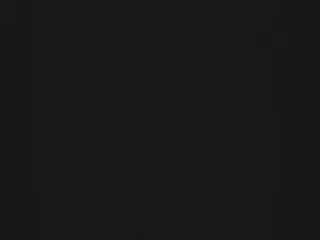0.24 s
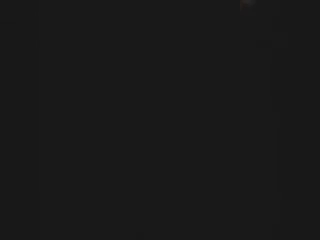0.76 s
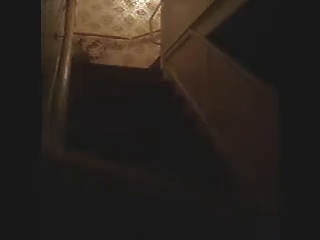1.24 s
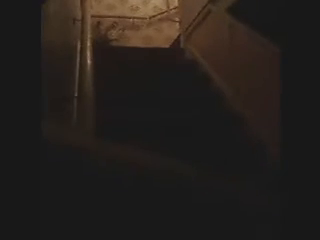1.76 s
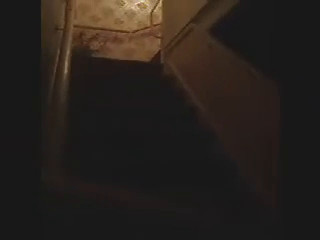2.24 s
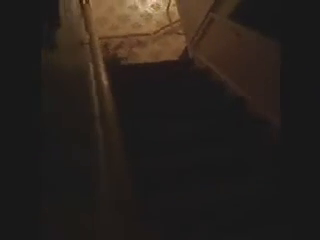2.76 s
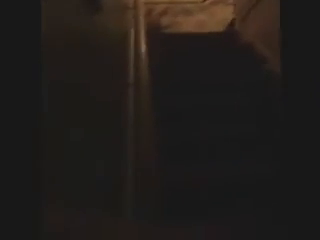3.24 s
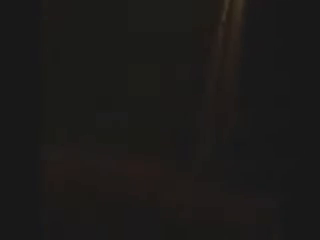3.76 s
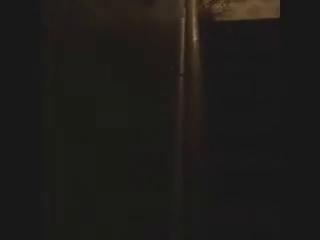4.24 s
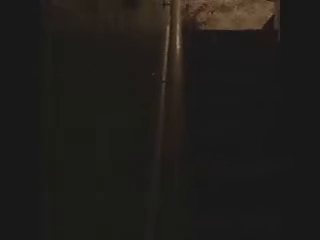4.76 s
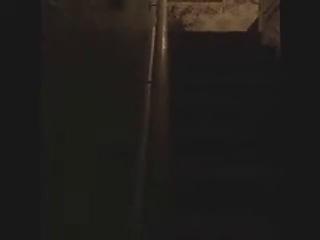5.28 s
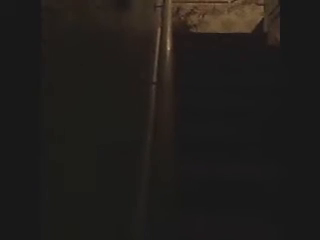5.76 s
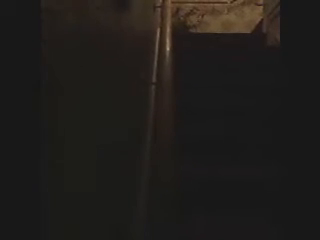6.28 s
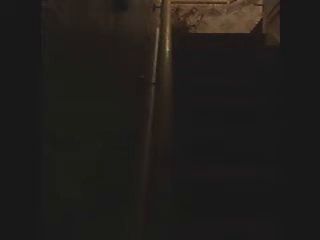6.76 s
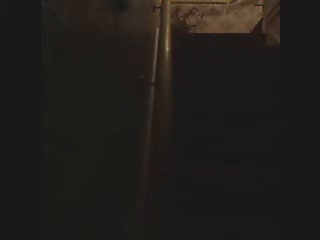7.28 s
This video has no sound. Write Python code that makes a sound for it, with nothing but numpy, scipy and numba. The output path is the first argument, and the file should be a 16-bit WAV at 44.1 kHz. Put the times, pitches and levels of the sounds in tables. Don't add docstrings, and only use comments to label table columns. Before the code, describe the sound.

Close, dry handling noise from a small plastic camera beside an indoor staircase, over constant low hiss. At about 0.07 s a loud knock with a deep bump and ticks hits the microphone, followed by a short rub and faint scratches until 0.2 s. It quietens, with slight rubbing near 0.6 and 0.8 s. At 1.58 s a plastic catch snaps, then palm and finger rubbing grows. From 2.5 s ticks, a rasp and thuds gather; heavy knocks cluster at 2.85-3.05 s with a sharp crack and scrape. Dull pushes come around 3.6-3.8 s, then the harshest bright rasps and a hard crack at 3.9-4.0 s. Lighter rubs continue, with small knocks at 5.25-5.8 s. Afterwards only hiss, faint sleeve brushing, a tiny tick at 7.24 s and a clearer distant low motor hum remain until 7.5 s. The tone is boxy and narrow, with faint mirrored treble grit.

```python
import sys
import numpy as np
from scipy import signal
from scipy.fft import rfft, irfft, next_fast_len
from scipy.io import wavfile
from scipy.ndimage import uniform_filter1d
from numba import njit

SR = 44100
rng = np.random.default_rng(int(sys.argv[2]) if len(sys.argv) > 2 else 0)


def volts_from_db(level):
    exponent = np.asarray(level, float) / 20
    return 10 ** exponent


def unload_wav(signal):
    wavfile.write(
        sys.argv[1],
        SR,
        np.round(np.clip(np.atleast_2d(signal).T, -1, 1) * 32767).astype(np.int16),
    )


N = 331587


@njit
def svf(x, hz, width):
    y, b, l = np.empty(len(x)), 0., 0.
    g, k = np.tan(np.pi * hz / SR), width / hz
    for i in range(len(x)):
        v = (b + g * (x[i] - l)) / (1 + g * (g + k))
        b, l, y[i] = 2 * v - b, l + 2 * g * v, k * v
    return y


def unit(x):
    return x / np.sqrt(np.mean(x ** 2))


def walk(rate):
    hold = int(SR / rate)
    steps = np.repeat(rng.standard_normal(N // hold + 1), hold)
    return 1.45 * uniform_filter1d(uniform_filter1d(steps, hold), hold)[:N]


def slips(rate, spread_db):
    when, size, sign = rng.random(N), rng.exponential(size=N), rng.standard_normal(N)
    return (when < rate / SR) * np.clip(sign, -2, 2) * volts_from_db(spread_db * np.minimum(size, 3))


def ring(x, modes):
    total = 0
    for hz, width, db in modes:
        once = svf(x, 1. * hz, 1.55 * width)
        twice = svf(once, 1. * hz, 1.55 * width) / np.sqrt(width)
        total = total + volts_from_db(db) * twice
    return unit(total)


def strokes(s, db, swell_s, fade_s):
    rounding = 1.61
    t = np.arange(0, N + 64, 64)[:, None] / SR - s
    drop_db = 20 * np.maximum(-t / swell_s, t / fade_s) ** rounding
    power = volts_from_db(2 * (db - drop_db)).sum(axis=1)
    return np.interp(np.arange(N) / 64, np.arange(len(t)), np.sqrt(power))


def palm_level():
    # peak_s, level_db, swell_s and fade_s (times for 20 dB)
    presses = [(0, -34.5, .1, 0.1), (0.16, -27.5, 0.063, 0.039), (.609, -49, 0.083, 0.041),
               (.813, -45, 0.09, 0.32), (1.4, -40.5, 0.17, 0.34), (1.626, -33.5, 0.28, 0.31),
               (1.756, -36, 0.18, 0.082), (1.836, -30.5, 0.018, 0.088), (2.011, -31.5, 0.15, 0.16),
               (2.175, -37, 0.038, .25), (2.4, -37.5, .25, 0.048), (2.53, -29, 0.15, 0.065),
               (2.64, -26, 0.11, 0.37), (2.868, -20.5, 0.13, 0.16), (2.943, -29, 0.16, 0.056),
               (3.062, -28, 0.052, 0.033), (3.392, -35.5, 0.43, 0.22), (3.57, -29, 0.13, 0.16),
               (3.729, -24, 0.11, 0.056), (3.85, -34, .05, .2), (3.955, -27, 0.26, 0.099),
               (4.15, -39.5, 0.29, .2), (4.355, -33.5, 0.37, .25), (4.59, -39, 0.23, 0.13),
               (4.759, -40, .17, 0.23), (5.33, -33.5, 0.15, 0.16), (5.42, -35.5, 0.12, 0.14),
               (5.652, -41, 0.21, 0.27), (5.97, -54, 0.091, 0.49), (6.994, -48.5, 0.089, 0.18)]
    resting_db = -54
    return np.hypot(strokes(*np.transpose(presses)), volts_from_db(resting_db))


def finger_and_sleeve_levels():
    # peak_s, level_db, swell_s and fade_s (times for 20 dB), cloth_share_db
    rubs = [(.05, -37, .3, 0.095, -6), (0.161, -25.5, 0.058, 0.015, -20), (.6, -46.5, 0.26, 0.18, -12),
            (.813, -41.5, 0.13, 0.16, -7), (1.412, -41, 0.42, .2, -6), (1.74, -31, 0.41, 0.19, -7.5),
            (2.011, -27, 0.12, 0.093, -5), (2.19, -39, 0.17, 0.47, -5.5), (2.49, -34, 0.091, 0.079, -5),
            (2.65, -22.5, .15, 0.2, -3.5), (2.868, -22, 0.28, 0.15, -4.5), (3.03, -31, 0.11, 0.091, 2),
            (3.558, -31.5, 0.22, 0.22, -25), (3.675, -25.5, 0.17, 0.084, -3.5),
            (3.85, -21.5, 0.062, 0.16, -11), (3.94, -20.5, 0.12, 0.093, 1.5),
            (4.101, -34, 0.14, 0.074, 0.5), (4.33, -34, 0.88, 0.33, -4), (4.59, -35.5, 0.23, 0.08, -3),
            (4.76, -41.5, 0.24, .22, -7), (5.31, -34.5, 0.075, 0.16, -13), (5.41, -33.5, 0.15, 0.067, -5),
            (5.66, -38.5, 0.13, 0.13, -7), (5.767, -40, 0.086, 0.055, -4),
            (1.15, -58, 0.22, 0.28, -16), (2.77, -30, .1, .1, -13), (5.37, -36.5, .07, .07, -14),
               (1.86, -38, .1, 0.14, -4.5), (3.2, -40.5, 0.33, 0.28, -7.5), (3.4, -37, 0.15, 0.23, -10),
               (3.78, -36.5, .08, 0.045, -16), (5.168, -44.5, .12, .06, -7),
               (5.255, -35.5, 0.043, 0.029, -6), (5.493, -35, 0.096, 0.041, -5), (6.4, -52, 0.94, 0.93, 4),
               (6.781, -48.5, 0.25, 0.34, 7), (7.0, -53, .1, 0.37, 2), (7.249, -50, 0.1, 0.089, 1),
               (7.52, -50.5, 0.16, .1, 9.5)]
    s, db, swell_s, fade_s, cloth_db = np.transpose(rubs)
    return strokes(s, db, swell_s, fade_s), strokes(s, db + cloth_db, swell_s, fade_s)


def rub():
    # pitch_hz, width_hz, level_db
    case_modes = [(374, 77.4, 5), (473, 143, 4), (267.2, 38, -6.5), (632, 147, -5)]
    shell_modes = [(1028, 395, 26.5), (1250, 646, 27.5), (1700, 430, 19.5), (1990, 200, -33.5),
                   (800, 450, -17)]
    cloth_modes = [(3300, 2130, 14.5), (2700, 220, -17), (4210, 900, 11)]
    swish_modes = [(2004, 1400, 0)]
    rumble_modes = [(122, 215, -4), (61.7, 180, -22), (211.5, 123, -3.5)]
    # time_s, level_db
    hug = [(0, 3), (.3, -4), (1.3, -2), (2.0, -0.5), (2.7, -1), (3.3, 3.5), (3.9, -2), (4.6, 2), (5.5, 4),
           (7.52, 5)]
    press_shell_db, press_rumble_db = -6.5, -10.5
    slide_case_db, slide_rumble_db = -5.5, -8.5

    press = palm_level()
    slide, sleeve = finger_and_sleeve_levels()
    drag = unit(slips(rate=8000, spread_db=1.7))
    grip_db = .7 * walk(45) + .9 * walk(140)

    case_level = np.hypot(press, volts_from_db(slide_case_db) * slide)
    case = case_level * volts_from_db(.9 * walk(25)) * ring(drag, case_modes)
    shell_level = np.hypot(slide, volts_from_db(press_shell_db) * press)
    shell = shell_level * volts_from_db(.7 * walk(35)) * ring(drag, shell_modes)
    cloth = sleeve * volts_from_db(.8 * walk(40)) * ring(drag + rng.standard_normal(N), cloth_modes)
    swish = sleeve * volts_from_db(-4.5) * ring(drag, swish_modes)
    weight = np.hypot(volts_from_db(press_rumble_db) * press, volts_from_db(slide_rumble_db) * slide)
    hug_db = np.interp(np.arange(N) / SR, *np.transpose(hug))
    rumble = weight * volts_from_db(hug_db + 2.0 * walk(32)) * ring(drag, rumble_modes)
    return volts_from_db(grip_db) * (case + shell + cloth + swish + rumble)


def hiss():
    # pitch_hz, level_db (per Hz)
    colour = [(15, -27), (25, -12), (43, -16), (80, -10.5), (118, -9), (258, -11.5), (300, -8), (363, -15),
              (796, -15.5), (3520, -18.5), (4000, -21), (5200, -59), (8800, -120)]
    level_db = -48.5
    hz = np.arange(N // 2 + 1) * SR / N + 1
    colour_hz, colour_db = np.transpose(colour)
    shape_db = np.interp(np.log(hz), np.log(colour_hz), colour_db)
    noise = irfft(rfft(rng.standard_normal(N)) * volts_from_db(shape_db), N)
    return volts_from_db(level_db + .5 * walk(3.6)) * unit(noise)


def hum():
    # pitch_hz, level_db
    tones = [(70, -54), (129.2, -65), (258.4, -59)]
    # time_s, level_db
    nearness = [(0, -24), (4.2, -16), (4.35, -3), (4.7, -13), (4.9, 0), (5.25, -7), (5.5, -6), (5.9, 0.5),
                (6.5, 0.5), (6.58, 1), (6.7, 2), (7.52, 1.5)]
    t = np.arange(N) / SR
    total = 0
    for hz, db in tones:
        total = total + volts_from_db(db + .7 * walk(4)) * np.sin(2 * np.pi * hz * t + .3 * walk(3))
    return np.sqrt(2) * volts_from_db(np.interp(t, *np.transpose(nearness))) * total


def ticks():
    # start_s, peak_db, pitch_hz, t60_s (time to fall 60 dB)
    events = [(0.024, -24, 1090, 0.017), (0.0657, -15.5, 3140, 0.0094), (.1185, -35, 1200, .012),
              (0.187, -17, 1700, 0.011), (0.0707, -15.5, 1200, 0.024), (2.156, -30, 1200, .015),
              (2.392, -21.5, 860, 0.018), (2.4942, -18.5, 3100, 0.026), (2.555, -17, 910, 0.052),
              (2.7505, -31, 595, .015), (2.8528, -23, 1590, .015), (2.9126, -13, 1390, 0.015),
              (2.934, -14, 1060, 0.02), (3.0546, -7, 1700, 0.013), (3.9629, -7.5, 1700, 0.014),
              (3.9686, -6, 1904, 0.019), (4.298, -33, 1110, .015), (4.729, -39, 1220, 0.017),
              (5.595, -30, 1180, 0.012), (7.2396, -32, 1250, 0.024), (.0662, -21, 613, 0.046),
              (3.0593, -9, 1500, 0.014)]
    out, t = np.zeros(N + 2000), np.arange(2000) / SR
    weights = volts_from_db(np.array([-11.5, 1, 5.5, -14, -26.5, -4.5]))
    chance = rng.standard_normal((len(events), 2006))
    for (s, db, hz, t60), row in zip(events, chance):
        partials = np.array([.34, .72, 1, 1.12, 1.5, 2.1]) * hz * (1 + 0.034 * row[2000:])
        fade = np.exp(-np.log(1000) * t * (partials[:, None] / hz) / t60)
        spit = 5.8 * svf(row[:2000] * fade[2], 1. * hz, 0.32 * hz)
        crack = weights @ (np.sin(2 * np.pi * partials[:, None] * t) * fade) + spit
        out[int(s * SR):][:2000] += volts_from_db(db) * crack / np.abs(crack).max()
    return out[:N]


def knocks():
    # start_s, peak_db, first_swing (+1 in, -1 out), swing_hz,
    # swings (count until 60 dB down)
    sharp = [(.0651, 6, 1, 390, 4.6), (2.4945, -18, -1, 350, 5), (2.5159, -15, -1, 480, 9),
             (2.8528, -3, -1, 165, 5.5), (2.8843, -2, 1, 310, 5.5), (2.9122, 2.5, -1, 230, 6.2),
             (3.0456, 2.5, 1, 380, 2.6), (3.1347, -20, -1, 420, 8), (3.7682, -19, 1, 240, 7),
             (3.9681, 2, -1, 800, 4), (5.2590, -22, -1, 400, 8), (5.3170, -22, -1, 500, 7),
             (5.3720, -9, 1, 380, 5.5), (5.6250, -25, -1, 400, 10), (5.7050, -23, -1, 700, 5.5),
             (5.7708, -27, 1, 900, 5.5), (6.0075, -33, -1, 380, 11)]
    soft = [
        (.0694, -5.5, 1, 66, 3),
        (3.640, -14, -1, 42, 5),
        (3.7815, -16, -1, 120, 5),
        (3.7910, -15, -1, 140, 5.5),
    ]
    out, t = np.zeros(N + 8000), np.arange(8000) / SR
    blows = [(*row, .00011) for row in sharp]
    blows += [(*row, .12 / row[3]) for row in soft]
    for s, db, sign, hz, swings, rise_s in blows:
        turns = .3 * hz * t + .7 * (1 - np.exp(-hz * t))
        fade = np.exp(-np.log(1000) * t * hz / swings)
        swing = np.cos(2 * np.pi * turns) * fade * (1 - np.exp(-t / rise_s))
        out[int(s * SR):][:8000] += sign * volts_from_db(db) * swing
    return signal.sosfilt(signal.butter(1, 35, "high", fs=SR, output="sos"), out[:N])


def rasps():
    # start_s, peak_db, length_s, colour_hz, width_hz
    events = [
        (0.13, -40, 0.012, 1500, 2000),
        (0.136, -27, 0.003, 1290, 1800),
        (0.158, -36, 0.004, 1500, 1990),
        (0.162, -30, 0.0031, 1490, 2200),
        (2.503, -12, 0.011, 1970, 3500),
        (3.049, -8.5, 0.016, 1540, 900),
        (3.912, -8, 0.018, 1320, 1500),
        (3.933, -6, 0.012, 3300, 1500),
        (3.951, -4.5, 0.01, 3300, 1500),
    ]
    out, t = np.zeros(N + 3000), np.arange(3000) / SR
    chance = rng.standard_normal((len(events), 2, 3000))
    for (s, db, length, hz, width_hz), (noise, ridge) in zip(events, chance):
        shape = np.exp(-np.maximum(t - length, 0) / 0.00071)
        ridges = volts_from_db(14 * uniform_filter1d(ridge, size=40))
        burst = svf(noise * ridges * shape, hz * 1., width_hz * 1.)
        out[int(s * SR):][:3000] += volts_from_db(db) * burst / np.abs(burst).max()
    return out[:N]


def latch():
    # pitch_hz, level_db, t60_s (time to fall 60 dB)
    modes = [(570, -5.5, 0.033), (1200, -7, 0.0094), (1500, 6.5, 0.0071), (1820, 1, .016),
             (2570, -1.5, 0.011), (3800, -10, 0.011)]
    start_s, level_db, rise_s = 1.5833, -7, .0004
    t = np.maximum(np.arange(N) / SR - start_s, 0)
    total = 0
    for hz, db, t60 in modes:
        total = total + volts_from_db(db) * np.sin(2 * np.pi * hz * t) * np.exp(-np.log(1000) * t / t60)
    return volts_from_db(level_db) * (1 - np.exp(-t / rise_s)) * total


def scene():
    return (rub() + hiss() + hum() + ticks() + knocks() + rasps() + latch())[None]


def mirror_bands(band):
    carriers = (12100, 7800, 4300, 8200, 16200)
    # below_db, above_db
    levels = [(-19, -18.5), (-27.5, -80), (-80, -28), (-31.5, -28), (-29, -80)]
    slope = np.gradient(band) * SR / (2 * np.pi * 3400)
    turning = signal.hilbert(slope, next_fast_len(N))[:N]
    mirrors = np.zeros(N)
    for hz, (below_db, above_db) in zip(carriers, levels):
        carrier = np.exp(2j * np.pi * hz * np.arange(N) / SR)
        mirrors += np.real(carrier * (volts_from_db(below_db) * np.conj(turning) + volts_from_db(above_db) * turning))
    return signal.sosfilt(signal.ellip(9, .3, 70, (4300, 12750), "band", fs=SR, output="sos"), mirrors)


def drop_bands(x):
    # low_hz, high_hz, silent_share (part of the time, 0 to 1)
    bands = [(4090, 4400, .93), (4400, 4600, .25), (4650, 4850, .2), (4900, 5050, .2), (5100, 5280, .25),
             (7750, 7950, .08), (12050, 12280, .55), (12400, 12600, .12)]
    spectrum, hz = rfft(x), np.arange(N // 2 + 1) * SR / N
    for low, high, share in bands:
        chance = walk(24)
        silent = uniform_filter1d(1. * (chance < np.quantile(chance, share)), size=700)
        x = x - silent * irfft(spectrum * ((hz >= low) & (hz < high)), N)
    return x


def roll_off(x):
    return signal.sosfilt(signal.butter(12, 13400, fs=SR, output="sos"), x)


def record(dry):
    low_pass = signal.cheby1(9, .3, 3805, fs=SR, output="sos")
    band = signal.sosfiltfilt(low_pass, np.clip(dry[0], -.92, .92))
    out = drop_bands(band + mirror_bands(band))
    glitch_s, glitch_db = .6217, -42
    out[int(glitch_s * SR)] += volts_from_db(glitch_db)
    mix = (out - .004)[None]
    return roll_off(mix)


dry = scene()
out = record(dry)
unload_wav(out)
```